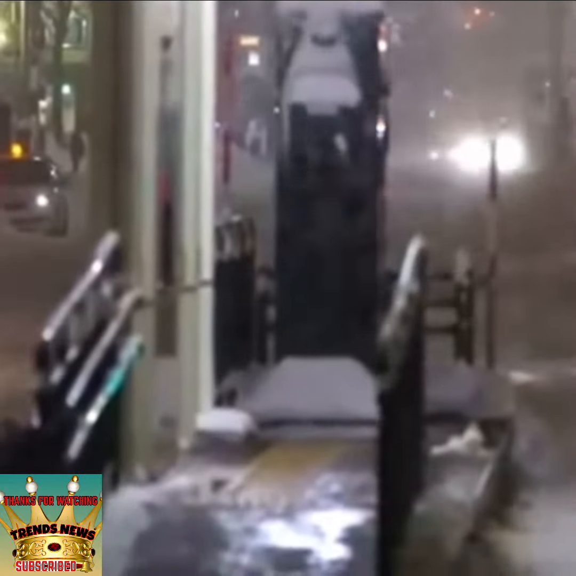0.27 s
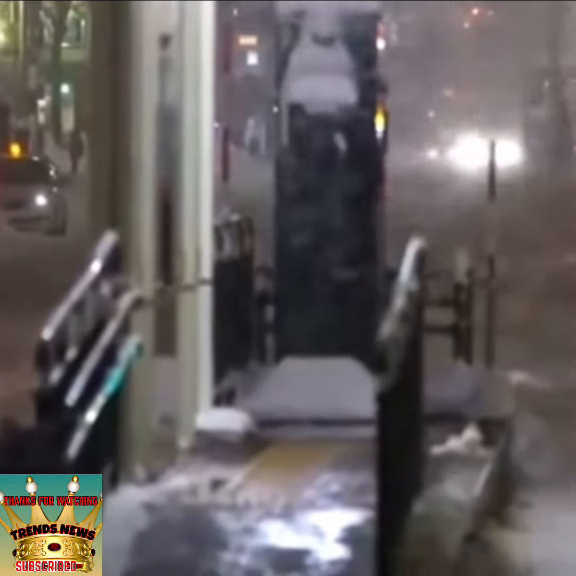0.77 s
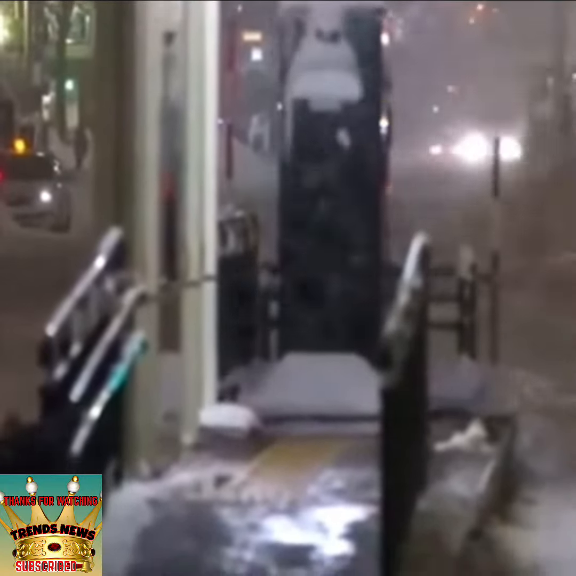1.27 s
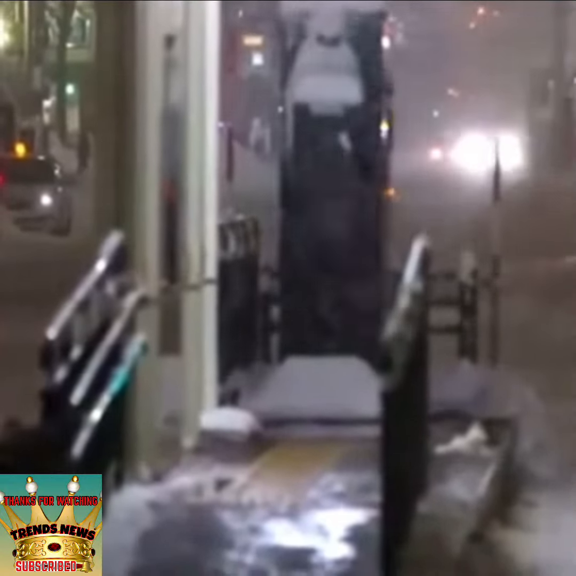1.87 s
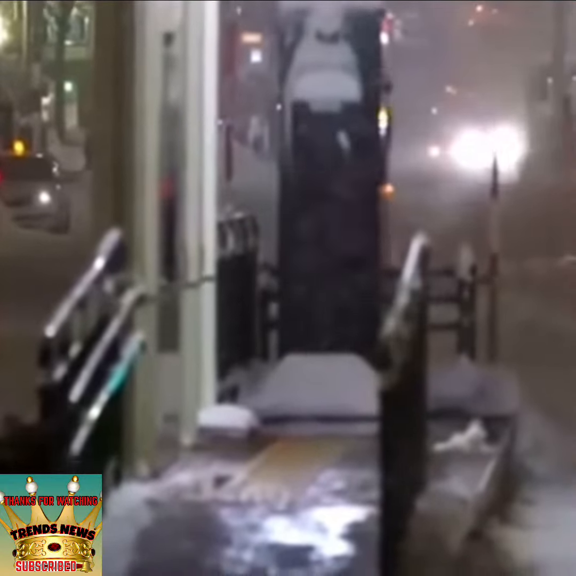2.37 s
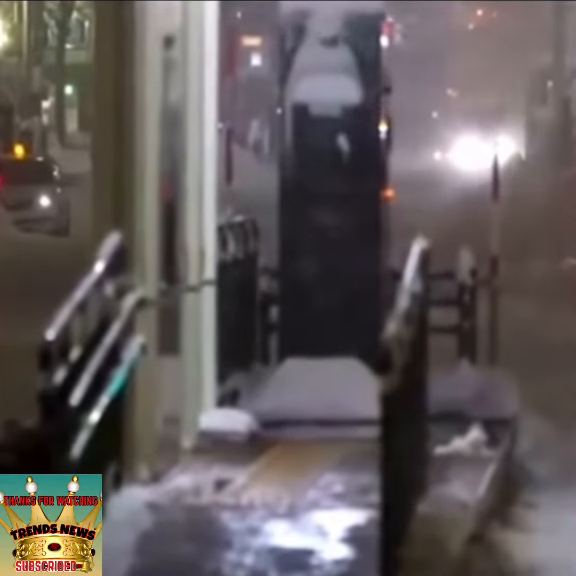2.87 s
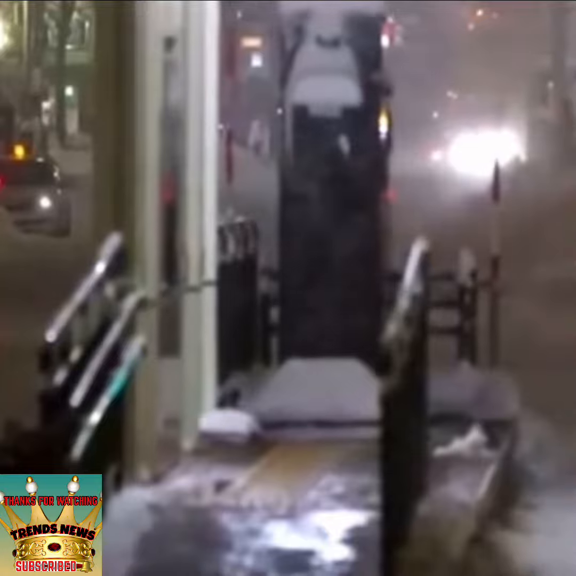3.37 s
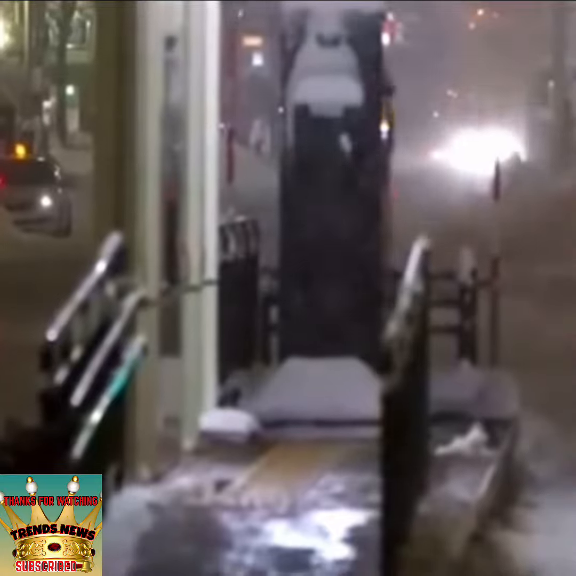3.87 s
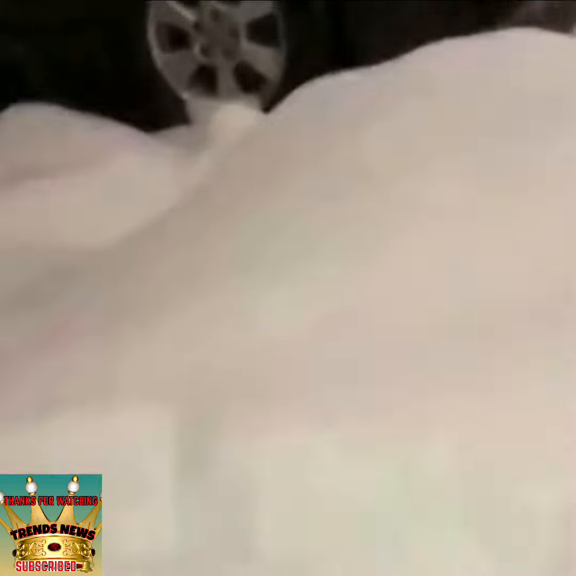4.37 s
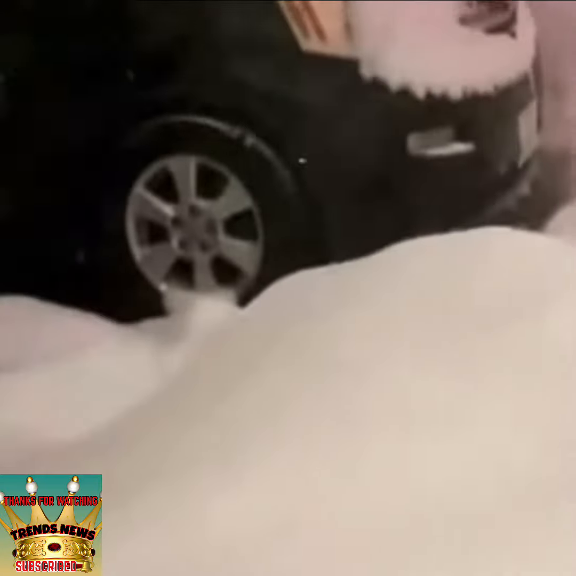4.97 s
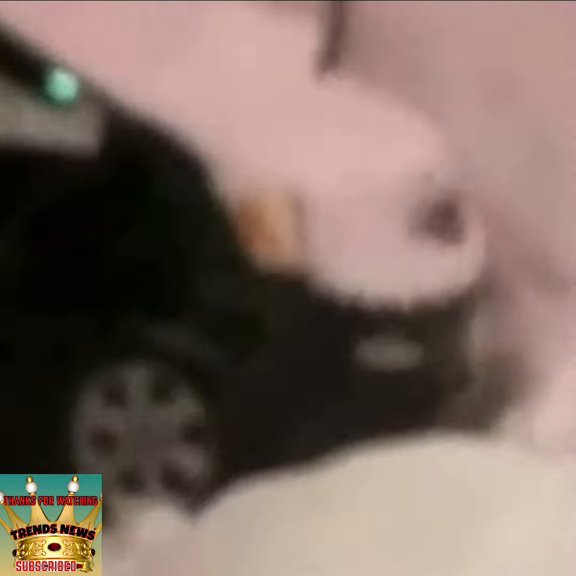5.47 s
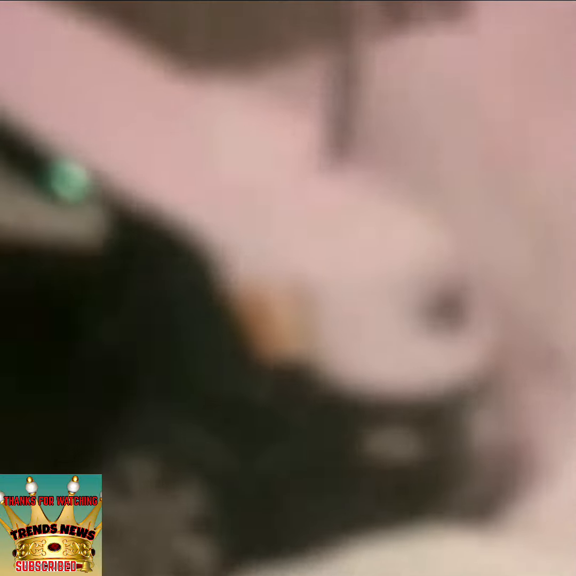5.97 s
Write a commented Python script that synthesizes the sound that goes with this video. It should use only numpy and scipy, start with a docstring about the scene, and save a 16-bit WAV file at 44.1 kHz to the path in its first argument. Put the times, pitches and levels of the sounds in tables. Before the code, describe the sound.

Storm wind rushes through a snowy city street at night, fluttering and rumbling on the microphone. Loose metal cracks and rings with echo between buildings, railings whistle waveringly and an engine drones low. The wind swells again in short bursts, then cuts off. After a tiny silence comes a quiet street: soft thuds and knocks on the microphone case jumping left and right, faint clothing rustle and distant traffic hum.

```python
"""Wind of a snowstorm rushes through a city street: fluttering noise bands, short surges, and lumps of low
noise as it buffets the microphone. Railings whistle as wavering tones; loose metal cracks and rings between the
houses; an engine drones. The scene changes abruptly. In a quiet street, thuds and flutters of grainy noise puff
at the left or right microphone port, decaying tones knock on the case, clothing rustles close by and far
traffic hums."""
import sys
import numpy as np
from scipy import signal
from scipy.io import wavfile

SR = 44100
rng = np.random.default_rng(int(sys.argv[2]) if len(sys.argv) > 2 else 0)


def dump_mix(stems):
    """Bounce the given channels to the path in sys.argv[1] as a 16-bit WAV at rate SR."""
    frames = np.atleast_2d(stems).T  # one column per channel
    limited = np.clip(frames, -1, 1)  # hard clip at full scale
    pcm = np.round(limited * 32767).astype(np.int16)
    wavfile.write(sys.argv[1], SR, pcm)


N = 274631
T = np.arange(N) / SR  # time of every sample, s

# All levels are set before street echoes, microphone port and the recorder's rounding and cut. Course of the
# wind: time_s, rush_db, brightness_db; level and brightness dip at the first bang and recover.
WIND_COURSE = [(0, -26, 0.5), (.49, -25.5, -1.5), (.53, -26, -13), (.9, -33, -5), (1.3, -29.5, -6),
               (1.8, -31.5, -1), (2.3, -31, -1), (2.7, -29, 1), (3.0, -30, 0.5), (3.5, -27, 3.5),
               (3.75, -23, 2), (4.0, -23, 3), (4.25, -23, 1.5)]
# Spectrum of the rush: band_hz, density_db (per Hz, relative)
RUSH_COLOUR = [(40, -17), (90, 1.5), (200, 1.5), (450, -0.5), (800, -3.5), (1400, -7.5), (2500, -13),
               (4500, -20.5), (7000, -29), (8500, -36.5), (10000, -36), (11500, -41.5), (13500, -40.5),
               (16000, -42.5)]
# Short surges that tear through the rush: centre_s, spread_s, centre_hz, level_db
WIND_SURGES = [(0.485, 0.02, 2120, -31.5), (2.503, 0.011, 1800, -35), (3.244, 0.011, 1884, -35),
               (3.421, 0.009, 1362, -31), (3.546, 0.015, 1397, -32), (3.827, 0.011, 1500, -33),
               (3.867, 0.0055, 3200, -31), (3.907, 0.015, 1300, -25.5), (3.985, 0.0073, 1380, -30),
               (4.022, 0.013, 500, -26), (4.117, 0.015, 477, -24.5), (4.165, 0.0097, 420, -26)]
# Large eddies passing over the microphone: start_s, length_s, level_db
LARGE_EDDIES = [(.05, 0.053, -25), (.24, 0.26, -26.5), (1.53, 0.16, -31.5), (1.77, 0.072, -29.5),
                (1.96, 0.13, -30.5), (2.31, 0.05, -28.5), (2.92, 0.083, -34.5), (3.1, 0.42, -35),
                (3.63, 0.22, -29.5), (4.03, 0.21, -30.5)]
# Spectrum of the buffeting: band_hz, density_db (per Hz, relative)
BUFFET_SPECTRUM = [(14, 2.5), (25, 3.5), (45, 1.5), (70, -3), (120, -20.5), (250, -13.5), (600, -45)]
# Sudden slaps of air on the case: centre_s, level_db, spread_s
AIR_SLAPS = [(2.5, -22.5, .016), (2.586, -26.5, .012), (4.025, -32, .016), (4.165, -31, .012)]
# Spectrum of a slap: band_hz, density_db (per Hz, relative)
SLAP_SPECTRUM = [(90, -23), (150, -5), (210, -2.5), (280, -15), (420, -25.5)]
# Higher whistling edge: time_s, pitch_hz, level_db
HIGH_EDGE = [(0, 760, -55), (.5, 750, -45), (.64, 735, -35), (.78, 729, -36), (.87, 748, -50),
             (1.0, 744, -43), (1.3, 740, -40), (1.7, 731, -46), (1.98, 731, -39.5), (2.15, 728, -45),
             (2.6, 714, -45), (2.9, 725, -57), (4.2, 732, -43)]
# Lower whistling edge: time_s, pitch_hz, level_db
LOW_EDGE = [(3.0, 538, -56), (3.1, 541, -39), (3.17, 542, -34), (3.21, 541, -40), (3.245, 540, -54),
            (3.31, 547, -35.5), (3.4, 546, -34.5), (3.53, 543, -60)]
# Blows on loose metal: start_s, body_db, crack_db, brightness_db, bass_db, t60_s (at 1 kHz),
# crack_centre_hz, struck_mode_hz, struck_mode_lift_db
METAL_BANGS = [(0.506, -25.5, -9.5, -1, -11.5, 0.91, 1350, 890, 7),
               (.599, -22.5, -18.5, 5.5, -1.5, 0.64, 700, 738, 13),
               (.633, -30, -36, -13, 11, 0.3, 400, 400, 10), (0.743, -36.5, -34, 3, -2.5, 1, 900, 501, 4.5),
               (0.990, -25, -17, -2, -6, 0.9, 1500, 1847, 7),
               (1.148, -19, -7, -5.5, -3.5, 0.59, 1500, 1270, 9),
               (1.243, -26.5, -31, 4.5, -4, 0.66, 2200, 1260, -12),
               (1.319, -36.5, -26, 0.5, -3, 0.42, 800, 484, 15),
               (1.412, -33, -38, -17, 0, 0.37, 700, 635, 9),
               (2.476, -32.5, -49, 14, -13.5, 0.55, 1300, 1885, 2)]
# Modes of the loose sheet: pitch_hz, width_hz, level_db (relative)
SHEET_MODES = [(230, 19, -0.5), (424, 130, -2.5), (488, 80, -3.5), (626.3, 40, -2.5), (742.4, 24, -7),
               (854, 40, -7.5), (954, 60, -2), (1137, 110, -3), (1268, 42, -9), (1570, 37, -12.5),
               (1880, 82, -14.5), (2198, 140, -10.5), (2480, 56, -16.5), (2775, 22, -17.5)]
# Spectrum of the echoing body: band_hz, density_db (per Hz, relative)
BODY_COLOUR = [(80, -33.5), (180, -15), (350, 4), (700, 0.5), (1200, 5.5), (1800, 0), (3000, -10),
               (5000, -28), (9000, -54.5), (16000, -83)]
# Spectrum of the crack: band_hz, density_db (per Hz, relative)
CRACK_COLOUR = [(200, -28), (600, -9), (950, -3), (1250, 4), (1750, 2), (2300, -8.5), (3000, -15),
                (5500, -20), (9000, -43.5), (16000, -61.5)]
# Engine drone: time_s, firing_hz, level_db
ENGINE_COURSE = [(0, 85.3, -35.5), (.48, 83.8, -34), (.6, 86.6, -43), (1.3, 82.34, -46), (1.6, 81, -41.5),
                 (2.2, 79.9, -39), (2.55, 76.9, -36), (2.85, 72.64, -44), (3.4, 75.9, -40.5),
                 (3.8, 78.5, -36.5), (4.2, 81.8, -29)]
# Puffs of air on a port: start_s, length_s, thud_db, flutter_db, left_minus_right_db
AIR_PUFFS = [(4.379, 0.037, -53, -63, -9), (4.468, 0.086, -36.5, -61, -23), (4.546, 0.025, -27, -25.5, -34),
             (4.612, 0.032, -28.5, -41.5, 10), (4.679, 0.072, -35, -64, -4),
             (4.746, 0.063, -29.5, -40.5, 9), (4.818, 0.052, -35, -34.5, 9.5),
             (4.887, 0.063, -29.5, -32, 13), (4.947, 0.041, -25, -28.5, 2.5),
             (4.986, 0.077, -30.5, -32.5, 11.5), (5.063, 0.02, -26, -26, 22),
             (5.142, 0.051, -29, -48, -7.5), (5.225, 0.043, -33, -61, 23), (5.322, 0.16, -44, -66, 3),
             (5.513, 0.04, -40, -60.5, 7), (5.566, 0.088, -41, -66, -20), (5.704, 0.085, -34.5, -45, 25),
             (6.003, 0.26, -51.5, -66, 7.5)]
# Spectrum of a dull thud: band_hz, density_db (per Hz, relative)
THUD_COLOUR = [(25, -30), (50, -11), (80, 1.5), (130, 4.5), (190, -1.5), (280, -9), (400, -24),
               (700, -52.5)]
# Spectrum of the muffled flutter: band_hz, density_db (per Hz, relative)
FLUTTER_COLOUR = [(200, -3.5), (300, 6), (420, -4), (520, -10.5), (700, -18.5), (1000, -30), (1500, -39),
                  (2500, -62), (4000, -72.5)]
# Knocks on the case: start_s, nominal_peak_db, nominal_pitch_hz, tick_db (relative), left_minus_right_db
CASE_KNOCKS = [(4.515, -25, 135, -58, -28), (4.5624, -18.5, 227, -53, -24),
               (4.5697, -12.5, 602, -12.5, -38), (4.574, -21, 263, -50, -28), (4.633, -31, 710, -61, 12),
               (4.636, -21.5, 283, -52, 8), (4.762, -22, 125, -66, 15), (4.775, -23.5, 258, -56, 10),
               (4.8053, -17.5, 192, -44, 6), (4.845, -27, 390, -50, 11), (4.857, -19.5, 290, -57, 15),
               (4.903, -27.5, 520, -56, 21.5), (4.916, -18.5, 257, -52, 5), (4.926, -27, 448, -52.5, 15),
               (4.956, -14, 312, -58, 11.5), (4.977, -18, 260, -52, -15), (4.988, -16, 260, -54, 12),
               (5.010, -19.5, 330, -58, 20.5), (5.021, -33, 530, -55, 11), (5.052, -21, 167, -60, 7),
               (5.0783, -17, 430, -24, 31), (5.158, -30, 142, -56, -3), (5.197, -25.5, 175, -50, -15),
               (5.199, -42, 613, -55, -12.5), (5.655, -28, 119, -67, -19), (5.718, -31, 210.6, -62, 22),
               (5.779, -28, 168, -66, 25)]
# A coat scuffing against itself: start_s, length_s, centre_hz, level_db
COAT_SCRAPES = [(4.517, .025, 1800, -73), (4.803, .08, 3100, -77.5), (4.825, .02, 2000, -70),
                (4.9, .4, 1580, -77), (5.063, 0.018, 1800, -60.5), (5.14, .02, 1900, -68.5),
                (5.26, .08, 2650, -80)]
# The weave sliding: start_s, length_s, centre_hz, level_db
WEAVE_SWISHES = [(4.534, .014, 6100, -74), (4.605, .07, 6670, -88), (4.717, .13, 6500, -77.5),
                 (4.977, .05, 6900, -75), (5.133, 0.21, 6540, -85), (5.35, 0.075, 6700, -75.5),
                 (5.43, 0.097, 6960, -75.5), (5.829, .012, 6600, -75)]
# Spectrum of the fine rustle: band_hz, density_db (per Hz, relative)
RUSTLE_COLOUR = [(2000, -13), (2800, 0.5), (4400, -25.5), (5600, -5), (7000, 5.5), (9000, -9),
                 (12000, -9.5), (15000, -28)]
# Far hum of the quiet street: time_s, level_db
STREET_COURSE = [(4.37, -75), (4.5, -64), (4.65, -49.5), (5.4, -51), (6.2, -53.5)]
# Spectrum of the hum: band_hz, density_db (per Hz, relative)
HUM_COLOUR = [(30, 2.5), (100, 4.5), (300, 0), (550, -10), (900, -12), (1200, -22), (1600, -33.5),
              (2500, -50), (4500, -52), (15000, -58.5)]
# Echoes from nearby fronts and the pavement: delay_s, level_db (relative)
NEAR_WALLS = [(.0113, -17), (.0179, -16), (.0267, -16), (.0371, -16), (.0529, -17)]
# Resonances of the microphone port: pitch_hz, width_hz, gain_db
PORT_RESONANCES = [(6710, 700, -0.5), (8060, 640, 3), (8520, 120, 9), (9040, 350, 6.5), (10640, 440, -1),
                   (13340, 520, 3.5)]

SMALL_EDDIES_DB = -42  # rumble between the large eddies
CLOTH_REST_DB = -93.5  # faint rubbing between movements
STREET_PAN_DB = -7  # left minus right
STORM_END_S, QUIET_START_S = 4.252, 4.38
CEILING_DB, CUTOFF_HZ = -9.5, 15450  # recorder: level that peaks approach, top of its range


def wind(gust_db=0.5, flutter_db=1.22):
    """Turbulent rush: all bands swell together and each flutters by itself."""
    level_db, bright_db = in_time(WIND_COURSE)
    level_db = level_db + gust_db * drift(8.3)
    rush = 0
    for hz, wave in bands(RUSH_COLOUR, white()):
        tilt_db = bright_db * treble_share(hz, 600, 10000)
        rush = rush + wave * from_db(level_db + tilt_db + flutter_db * drift(21))
    return rush


def surges(width_share=0.75):
    """Each surge of air swells and fades within a moment, in a broad band of its own."""
    out = 0
    for centre_s, spread_s, hz, db in WIND_SURGES:
        band = narrow_band(rng.standard_normal(N), hz, hz * width_share)
        out = out + band * from_db(db) * moment(centre_s, spread_s)
    return out


def buffeting():
    """Eddies press on the microphone port in lumps; now and then one slaps the case."""
    eddies = swells(LARGE_EDDIES, attack_s=0.026, release_s=0.04)
    pressure = np.hypot(from_db(SMALL_EDDIES_DB), eddies)
    rumble = coloured(BUFFET_SPECTRUM, white()) * pressure
    slaps = sum(from_db(db) * moment(centre_s, spread_s) for centre_s, db, spread_s in AIR_SLAPS)
    return rumble + slaps * coloured(SLAP_SPECTRUM, white())


def whistles():
    """Wind over two railing edges gives two tones that waver in pitch and strength."""
    high = wavering_tone(HIGH_EDGE, wander_hz=4, waver_db=2.2)
    low = wavering_tone(LOW_EDGE, wander_hz=1.5, waver_db=.8)
    return high + low


def bangs():
    """Each blow on loose metal cracks, then its modes ring in a dense street echo."""
    out = np.zeros((1, N))
    crack, modes, wash = list(bands(CRACK_COLOUR, white())), sheet_modes(), echo_wash()
    for start_s, body_db, crack_db, bright_db, bass_db, t60_s, crack_hz, struck_hz, struck_db in METAL_BANGS:
        start = int(start_s * SR)
        span = slice(start, start + SR)
        age = T[span] - T[span][0]
        body = [(hz, wave[:, span]) for hz, wave in wash]
        for hz, wave in modes:
            lift_db = struck_db * nearness(hz, struck_hz, octaves=0.12)
            body.append((hz, wave[:, span] * from_db(lift_db)))
        for hz, wave in body:
            gain = body_envelope(age, hz, t60_s)
            tilt_db = bright_db * treble_share(hz, 700, 3400)
            tilt_db += bass_db * (1 - treble_share(hz, 367, 700))
            out[:, span] += wave * gain * from_db(body_db + tilt_db)
        for hz, wave in crack:
            focus_db = 2 * nearness(hz, crack_hz, octaves=0.55) - 1  # from -1 to 1 dB
            colour_db = 2 * bright_db * treble_share(hz, 1000, 2500) + focus_db
            out[:, span] += wave[:, span] * crack_envelope(age, hz) * from_db(crack_db + colour_db)
    return out


def sheet_modes(ring_db=-7.5):
    """The sheet's resonances as narrow bands of noise."""
    return [(hz, from_db(ring_db + db) * narrow_band(white()[0], hz, width_hz))
            for hz, width_hz, db in SHEET_MODES]


def echo_wash(wash_db=-3.5):
    """Dense echo between the houses as broad noise bands."""
    return [(hz, from_db(wash_db) * wave) for hz, wave in bands(BODY_COLOUR, white())]


def body_envelope(age, hz, t60_s, build_cycles=4.6, damping=0.1):
    """In the echo, lows build up later and last longer."""
    build = 1 - np.exp(-age * hz / build_cycles)
    return build * from_db(-60 * age / t60_s * (hz / 1000) ** damping)


def crack_envelope(age, hz, rise_s=0.0017, t60_s=0.058, damping=0.36, lag=0.7):
    """The crack darkens as it dies: highs rise and fall faster; times hold at 1500 Hz."""
    height = hz / 1500
    rise = 1 - np.exp(-age / rise_s * height ** lag)
    return rise * from_db(-60 * age / t60_s * height ** damping)


def engine():
    """The firing rate of an engine, heard as one unsteady low tone."""
    return wavering_tone(ENGINE_COURSE, wander_hz=1.5, waver_db=1.5)


def puffs(uneven_db=1.5):
    """Each puff hits mostly one port: dull thuds, and a muffled flutter that stops sooner."""
    thud_rows = [(s, length_s, db, pan_db) for s, length_s, db, _, pan_db in AIR_PUFFS]
    flutter_rows = [(s, length_s, db, pan_db) for s, length_s, _, db, pan_db in AIR_PUFFS]
    thud_gain = port_gains(thud_rows, attack_s=0.016, release_s=0.031)
    flutter_gain = port_gains(flutter_rows, attack_s=0.01, release_s=0.011)
    thud = thud_gain * coloured(THUD_COLOUR, grains(per_s=900, spread_db=4))
    flutter = flutter_gain * coloured(FLUTTER_COLOUR, grains(per_s=600, spread_db=8))
    return (thud + flutter) * from_db(uneven_db * drift(25))


def port_gains(rows, attack_s, release_s):
    """Gain of the puffs at the left and right port."""
    gains = []
    for side in (0, 1):
        heard = [(s, length_s, db + 20 * np.log10(panned(pan_db)[side, 0]))
                 for s, length_s, db, pan_db in rows]
        gains.append(swells(heard, attack_s, release_s))
    return np.array(gains)


def knocks(ring_cycles=5.4, rise_cycles=0.43, tick_hz=1500, tick_top_hz=7000):
    """A padded touch near one port swells softly and rings the case for a few cycles, with a tick on top."""
    thumps, ticks = np.zeros((2, N)), np.zeros((2, N))
    detune = 1 + .12 * rng.uniform(-1, 1, (len(CASE_KNOCKS), 2, 1))  # each port up to 12 % off pitch
    for (start_s, peak_db, hz, tick_db, pan_db), ratio in zip(CASE_KNOCKS, detune):
        at = int(start_s * SR)
        cycles = T[:SR // 10] * hz * ratio
        swell = 1 - np.exp(-(cycles / rise_cycles) ** 3)
        ring = from_db(peak_db + 9.5 - 60 * cycles / ring_cycles)  # 9.5 dB offsets decay during the swell
        far_port_lag = np.array([[pan_db < 0], [pan_db >= 0]]) * np.pi / 2
        thump = np.sin(2 * np.pi * cycles - far_port_lag) * swell * ring
        thumps[:, at:at + cycles.shape[1]] += panned(pan_db) * thump
        half_cycle = int(SR / hz / 2)
        ticks[:, at + half_cycle] += panned(pan_db)[:, 0] * from_db(peak_db + tick_db)
    soften = signal.butter(2, tick_hz, fs=SR, output="sos")
    ticks = signal.sosfilt(soften, ticks + 1e-18) * SR / tick_hz / 2
    dull = signal.butter(1, tick_top_hz, fs=SR, output="sos")
    return thumps + signal.sosfilt(dull, ticks)


def clothing(clump_db=4.0, scrape_width_share=0.26, swish_width_hz=1000, rustle_db=-5):
    """A coat scuffs in clumps of tiny slips; its weave swishes in narrow bands with a fine rustle around."""
    slips, threads = grains(per_s=1100, spread_db=15.5)
    scrape = swish = 0
    for s, length_s, hz, db in COAT_SCRAPES:
        gain = swells([(s, length_s, db)], attack_s=0.0057, release_s=0.019)
        scrape = scrape + gain * narrow_band(slips, hz, hz * scrape_width_share)
    for s, length_s, hz, db in WEAVE_SWISHES:
        gain = swells([(s, length_s, db)], attack_s=0.01, release_s=0.026)
        swish = swish + gain * narrow_band(threads, hz, swish_width_hz)
    moves = [(s, length_s, db) for s, length_s, _, db in WEAVE_SWISHES]
    movement = swells(moves, attack_s=0.016, release_s=.03)
    rustle_gain = np.hypot(from_db(CLOTH_REST_DB), from_db(rustle_db) * movement)
    rustle = rustle_gain * coloured(RUSTLE_COLOUR, grains(per_s=2500, spread_db=15))
    scrape_clumps = from_db(clump_db * drift(40))
    swish_clumps = from_db(clump_db / 2 * drift(40))
    return scrape_clumps * scrape + swish_clumps * (swish + rustle)


def quiet_street():
    """Far traffic hum: low noise, unrelated left and right, stronger on the right."""
    level_db, = in_time(STREET_COURSE)
    hum = coloured(HUM_COLOUR, white(channels=2))
    return panned(STREET_PAN_DB) * from_db(level_db) * hum


def street_echoes(x):
    """A few close reflections comb the sound and make it hollow."""
    out = x
    for delay_s, db in NEAR_WALLS:
        delayed = np.pad(x, ((0, 0), (int(delay_s * SR), 0)))[:, :N]
        out = out + from_db(db) * delayed
    return out


def port(x):
    """The small cavity before the microphone lifts and dents the hiss."""
    for hz, width_hz, db in PORT_RESONANCES:
        x = x + (from_db(db) - 1) * resonance(x, hz, width_hz)
    return x


def wavering_tone(rows, wander_hz, waver_db):
    """A sine whose pitch and strength are never quite steady; rms 1 at 0 dB."""
    hz, level_db = in_time(rows)
    phase = 2 * np.pi * np.cumsum(hz + wander_hz * drift(16.6)) / SR
    return np.sqrt(2) * np.sin(phase) * from_db(level_db + waver_db * drift(6.2))


def swells(rows, attack_s, release_s):
    """Gain of separate movements (start_s, length_s, level_db): rise, hold until the length is up, die away."""
    power = 0
    for s, length_s, db in rows:
        rise = np.clip((T - s) / attack_s, 0, 1)
        fall = np.exp(-np.maximum(T - s - length_s, 0) / release_s)
        power = power + (from_db(db) * rise * fall) ** 2
    return np.sqrt(power)


def moment(centre_s, spread_s):
    """Bell-shaped gain around one instant."""
    return np.exp(-((T - centre_s) / spread_s) ** 2 / 2)


def bands(colour, sources):
    """Third-octave bands (Hz, wave) of two sources dealt in turn; their powers follow the colour and add to 1."""
    hz, db = np.transpose(colour)
    edges = 12.5 * 2 ** (np.arange(32) / 3)
    edges = edges[(edges > hz[0] * .8) & (edges < hz[-1] * 1.25)]
    centres = np.sqrt(edges[1:] * edges[:-1])
    density = from_db(np.interp(np.log(centres), np.log(hz), db))
    gains = density * np.sqrt(np.diff(edges))
    for k, gain in enumerate(gains / np.linalg.norm(gains)):
        sos = signal.butter(3, edges[k:k + 2], "band", fs=SR, output="sos")
        yield centres[k], gain * rms_one(signal.sosfilt(sos, sources[k % 2]))


def coloured(colour, sources):
    """All bands together."""
    return sum(wave for hz, wave in bands(colour, sources))


def white(channels=1):
    """Two unrelated white noises."""
    return rng.standard_normal((2, channels, N))


def grains(per_s, spread_db):
    """Two stereo streams of random clicks of uneven size."""
    shape = (2, 2, N)
    sizes = from_db(spread_db * rng.random(shape)) * rng.choice([-1, 1], shape)
    return sizes * (rng.random(shape) < per_s / SR) + 1e-18


def drift(rate_hz):
    """Slow chance of spread 1: noise twice through a one-pole low-pass, drawn at every 40th sample."""
    r = np.exp(-80 * np.pi * rate_hz / SR)
    noise = rng.standard_normal(N // 40 + 2002)
    slow = signal.lfilter([1], [1, -2 * r, r * r], noise)[2000:]  # skip the filter's start
    return np.interp(np.arange(N) / 40, np.arange(len(slow)), rms_one(slow))


def resonance(x, hz, width_hz):
    """Band-pass with gain 1 on top."""
    return signal.lfilter(*signal.iirpeak(hz, hz / width_hz, fs=SR), x + 1e-18)


def narrow_band(x, hz, width_hz):
    """A resonance applied twice; rms 1."""
    return rms_one(resonance(resonance(x, hz, width_hz), hz, width_hz))


def nearness(hz, centre_hz, octaves):
    """1 at the centre, falling to 0 on both sides."""
    return np.exp(-(np.log2(hz / centre_hz) / octaves) ** 2)


def treble_share(hz, low_hz, high_hz):
    """0 below low_hz, rising to 1 at high_hz."""
    return np.interp(np.log(hz), np.log([low_hz, high_hz]), [0, 1])


def in_time(rows):
    """The columns of a curve, at every sample."""
    s, *columns = np.transpose(rows)
    return [np.interp(T, s, c) for c in columns]


def panned(pan_db):
    """Left and right gains of constant power."""
    return rms_one(from_db(np.array([[pan_db], [-pan_db]]) / 2))


def from_db(db):
    """Decibels to gain."""
    return 10 ** (np.asarray(db) / 20)


def rms_one(x):
    """Scale to rms 1."""
    return x / np.sqrt(np.mean(x ** 2) + 1e-20)


def scene():
    """The storm is heard in the middle until the scene changes abruptly; in the quiet street puffs and knocks
    jump between sides."""
    through_port = port(from_db(-1.5) * street_echoes(wind()) + bangs())
    storm = through_port + surges() + buffeting() + whistles() + engine()
    quiet = puffs() + knocks() + clothing() + quiet_street()
    return storm * (T < STORM_END_S) + quiet * (T > QUIET_START_S)


def record(dry):
    """The recorder rounds the loudest peaks and cuts the top steeply."""
    ceiling = from_db(CEILING_DB)
    rounded = dry / (1 + (dry / ceiling) ** 4) ** .25
    low_pass = signal.ellip(10, .2, 80, CUTOFF_HZ, fs=SR, output="sos")
    return signal.sosfilt(low_pass, rounded)


dry = scene()
out = record(dry)
dump_mix(out)
```